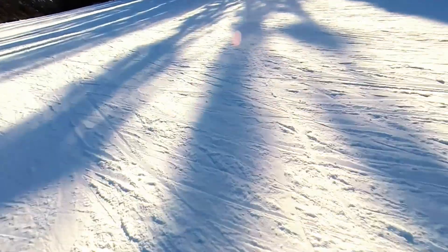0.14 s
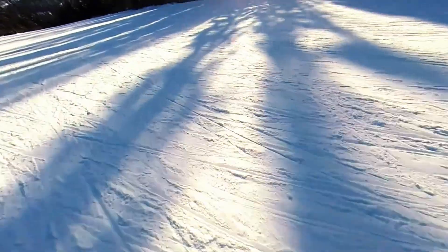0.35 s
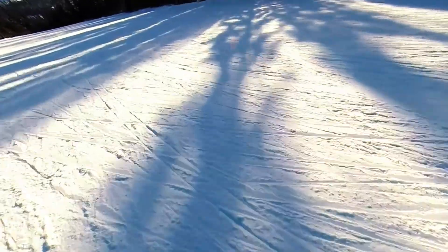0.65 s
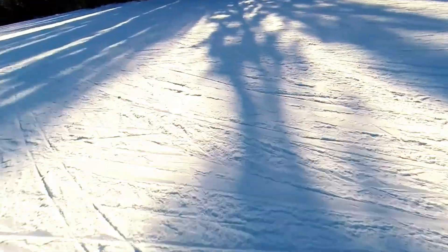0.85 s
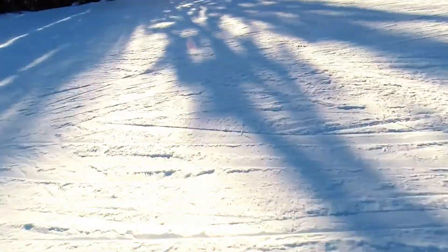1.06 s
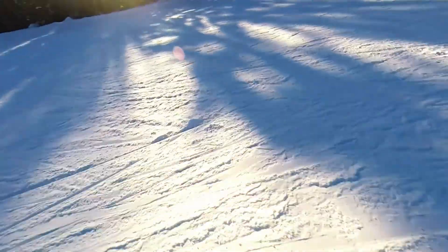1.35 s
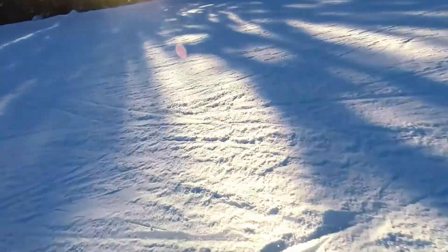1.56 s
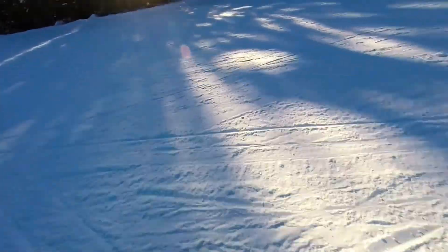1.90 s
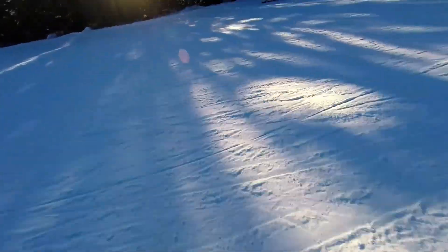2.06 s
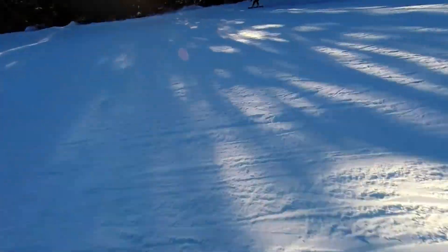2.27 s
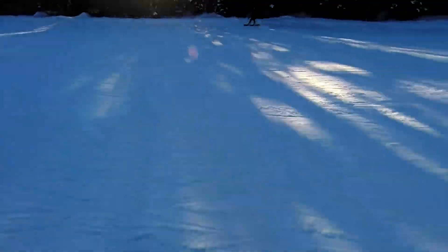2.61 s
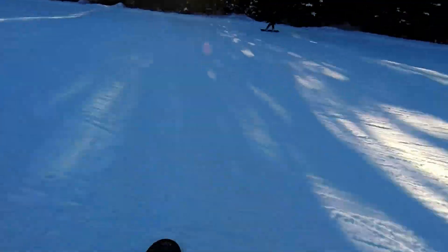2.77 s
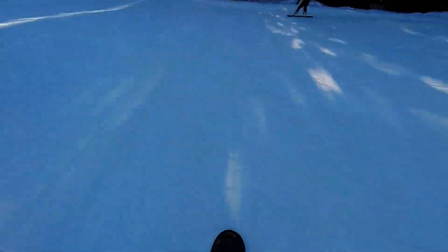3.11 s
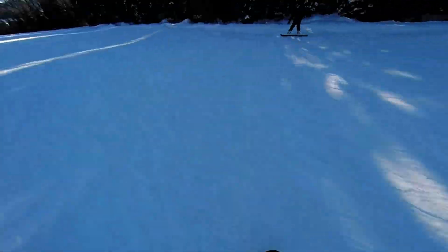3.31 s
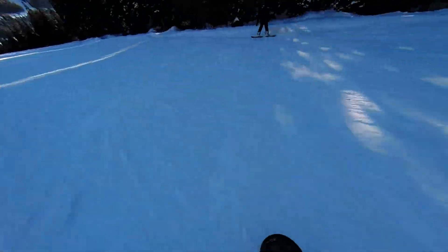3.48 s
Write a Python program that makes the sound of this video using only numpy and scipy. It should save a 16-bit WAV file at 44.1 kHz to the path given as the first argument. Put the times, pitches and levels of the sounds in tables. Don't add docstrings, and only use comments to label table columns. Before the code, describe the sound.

A snowboard hisses and scrapes over packed snow on an open slope, heard close through a closed plastic camera housing; low wind and board rumble beneath, small knocks, then a very loud sharp click near the end.

```python
import sys
import numpy as np
from scipy import signal
from scipy.io import wavfile
from scipy.ndimage import uniform_filter1d

SR = 44100
rng = np.random.default_rng(int(sys.argv[2]) if len(sys.argv) > 2 else 0)


def makeup_ratio(level_db):
    decades = np.asarray(level_db, float) / 20
    return 10 ** decades


def store_wav(level_fs):
    pcm = np.round(np.clip(np.atleast_2d(level_fs), -1, 1) * 32767)
    wavfile.write(sys.argv[1], SR, pcm.T.astype(np.int16))


N = 160965


def evened(x):
    return x / np.sqrt(np.mean(x ** 2) + 1e-20)


def curve(table, column):
    rows = np.array(table)
    return np.interp(np.arange(N) / SR, rows[:, 0], rows[:, column])


def add(mix, start_s, sound):
    part = mix[round(start_s * SR):][:len(sound)]
    part += sound[:len(part)]


def response(peaks, tilt_db=0., size=8192):
    hz = abs(np.fft.fftfreq(size, 1 / SR)) + 1
    power = sum(makeup_ratio(2 * db) / (1 + (2 * (hz - f) / width) ** 2) ** 2 for f, width, db in peaks)
    tilt = makeup_ratio(2 * tilt_db * np.log2(hz / 2000))
    log_gain = np.log(power * tilt + 1e-14) / 2
    spectrum = np.exp(np.conj(signal.hilbert(log_gain)))
    return np.fft.ifft(spectrum).real[:size // 2]


def colour(x, peaks):
    return evened(signal.oaconvolve(x, response(peaks))[:N])


def patchy(x, patch_db, wide=6, long=8, size=512):
    overlap = size * 3 // 4
    z = signal.stft(x, nperseg=size, noverlap=overlap)[2]
    field = rng.standard_normal(z.T.shape).T
    field = uniform_filter1d(uniform_filter1d(field, wide, 0), long, 1)
    z = z * makeup_ratio(patch_db * evened(field))
    return signal.istft(z, nperseg=size, noverlap=overlap)[1][:N]


def slow(top_hz):
    t = np.arange(0, N, 64) / SR
    rates = np.geomspace(3, top_hz, num=30)
    wave = sum(np.sin(2 * np.pi * (f * t + rng.random())) / f ** 0.11 for f in rates)
    return np.interp(np.arange(N) / SR, t, evened(wave))


# (pitch [Hz], width [Hz], level [dB])
HOUSING_RESONANCES = [(1214, 310, -13.5), (1766, 222, -3), (2020, 573, 1.5), (2415, 650, -2.5),
                      (2897, 740, -6), (3424, 304, -9.5), (4140, 940, -23), (5000, 790, -15),
                      (5890, 1120, -23.5), (6800, 1500, -24.5), (8440, 1800, -27), (10160, 1440, -32.5),
                      (11360, 2200, -36), (14100, 3700, -42)]
# (time [s], scrape level [dB], spray against scrape [dB], rumble against scrape [dB])
RIDE_LEVELS = [(0, -42.5, -26, -7.5), (.1, -43, -22.5, -6.5), (.6, -43.5, -26.5, -5), (.85, -43, -23, -6.5),
               (1.02, -45, -21.5, 0), (1.1, -41, -20.5, -9.5), (1.33, -40, -20.5, -7.5),
               (1.48, -41.5, -22.5, -9.5), (1.56, -45, -18.5, -1.5), (1.92, -41.5, -22, -4.5),
               (2.12, -42.5, -20, -4), (2.5, -44, -20.5, 2), (2.74, -41.5, -24, -2.5), (2.9, -47, -20, 0.5),
               (3.12, -43, -22.5, -0.5), (3.4, -38.5, -23, -5), (3.5, -38, -19, -1.5),
               (3.65, -37.5, -23.5, -8.5)]


def snow():
    crystals_per_s, crystal_spread_db, crystal_share = 2500, 1.5, 0.39
    patch_db, chatter_db = 0.74, 1.12
    low_top_hz, spray_from_hz, spray_extra_db = 3900, 4600, 1.5
    size = makeup_ratio(crystal_spread_db * np.minimum(rng.exponential(1, N), 5))
    breaks = rng.random(N) < crystals_per_s / SR
    crystals = evened(size * breaks * rng.choice([-1., 1.], N))
    smooth = rng.standard_normal(N)
    drive = np.sqrt(crystal_share) * crystals + np.sqrt(1 - crystal_share) * smooth
    hiss = colour(patchy(drive, patch_db), HOUSING_RESONANCES) * makeup_ratio(chatter_db * slow(40))

    top = signal.sosfiltfilt(signal.butter(2, spray_from_hz, "high", fs=SR, output="sos"), hiss)
    low = signal.sosfiltfilt(signal.butter(3, low_top_hz, "low", fs=SR, output="sos"), hiss)
    middle = hiss - low - top
    spray_db = curve(RIDE_LEVELS, 2)
    spray_db = spray_db - np.mean(spray_db)
    spray = middle * makeup_ratio(spray_db) + top * makeup_ratio(spray_extra_db + spray_db)
    return makeup_ratio(curve(RIDE_LEVELS, 1)) * (low + spray)


# (pitch [Hz], width [Hz], level [dB])
WIND_BANDS = [(13.9, 13, -2), (36, 11.4, -3)]


def wind(shake):
    level_db, follow = -41, 0.72
    gusts = uniform_filter1d(shake, size=6000) ** follow
    return colour(rng.standard_normal(N), WIND_BANDS) * makeup_ratio(level_db) * gusts


# (pitch [Hz], width [Hz], level [dB])
BOARD_RESONANCES = [(67.5, 37, -50.5), (115, 54, -51), (217.6, 99, -59.5), (300, 175, -58.5),
                    (435, 270, -65), (646, 240, -68), (900, 510, -75.5)]


def rumble(shake):
    rumble_follow, shake_follow, patch_db = 0.72, 0.093, 2
    level_db = curve(RIDE_LEVELS, 1) + rumble_follow * curve(RIDE_LEVELS, 3)
    rough = patchy(rng.standard_normal(N), patch_db, wide=3, long=4, size=2048)
    return makeup_ratio(level_db) * shake ** shake_follow * colour(rough, BOARD_RESONANCES)


# (time [s], peak level [dB], flexing pitch [Hz], length [s])
SNOW_BUMPS = [(0.095, -34.5, 36.9, 0.2), (0.263, -44, 37, 0.03), (0.471, -37, 33, 0.055),
              (0.56, -36, 29.5, 0.15), (1.198, -29.5, 37.7, 0.086), (1.36, -31, 37.8, 0.046),
              (1.446, -32.5, 34.6, 0.1), (1.595, -36.5, 35.5, 0.054), (1.754, -34.5, 38.4, 0.061),
              (1.829, -40, 35.2, 0.045), (1.892, -36.5, 35.6, 0.14), (1.963, -39, 36.4, 0.038),
              (2.179, -34.5, 37, 0.075), (2.263, -32, 37.4, 0.043), (2.338, -34.5, 38.4, 0.064),
              (2.516, -35, 33, 0.096), (2.688, -34, 32.8, 0.076), (2.841, -33.5, 32.8, 0.098),
              (2.983, -35, 34.9, 0.049), (3.107, -32.5, 33, 0.053), (3.196, -26.8, 35, 0.029),
              (3.331, -24.5, 34.6, 0.12), (3.463, -28, 35, 0.042), (3.606, -23, 33.8, 0.039)]


def board_flex():
    stretch = 1.19
    t, flex, swing = np.arange(N) / SR, np.zeros(N), np.zeros(N)
    for (s, db, hz, length_s), phase in zip(SNOW_BUMPS, rng.random(len(SNOW_BUMPS))):
        shape = makeup_ratio(db) * np.exp(-2.8 * ((t - s) / (stretch * length_s)) ** 2)
        flex += shape * np.cos(2 * np.pi * (hz * (t - s) + phase))
        swing += shape
    shake = (swing + 0.0067) / np.median(swing + 0.0041)
    return flex, shake


# (time [s], peak level [dB], pitch [Hz], time to fall 60 dB [s])
MOUNT_KNOCKS = [(0.539, -37, 128, 0.075), (.91, -24, 95, 0.067), (.92, -34.5, 48, 0.31),
                (1.079, -29, 41, 0.27), (1.32, -34.5, 300, 0.086), (1.761, -25.5, 3400, .008),
                (2.897, -37, 5000, 0.0045), (3.024, -38, 6200, .004), (3.089, -38, 6500, 0.0052),
                (3.2704, -20.5, 690, 0.023), (3.271, -28, 5050, 0.0068), (3.34, -32, 420, .03),
                (3.455, -19.5, 6800, 0.0076), (3.455, -26.5, 1176, 0.027), (3.46, -31.5, 115, 0.11),
                (3.505, -37, 320, 0.071), (3.543, -20.5, 311, 0.04)]


def knocks():
    out = np.zeros(N)
    for s, db, hz, t60 in MOUNT_KNOCKS:
        t = np.arange(0, 1.2 * t60, 1 / SR)
        rise = np.minimum(t * hz / 1.33, 1)
        add(out, s, makeup_ratio(db - 60 * t / t60) * rise * np.sin(2 * np.pi * hz * t))
    return out


# (pitch [Hz], level [dB], ring time [ms])
LID_RINGS = [(2051, 1.5, 0.43), (2384, -6.5, 0.65), (2880, -16.5, 0.93), (3330, -18, 0.73)]
# (time [s], peak level [dB], brightness [dB per octave])
ICE_CHIPS = [
    (1.6811, -21, -9),
    (3.2698, -20.5, 11),
    (3.3521, -21, -9),
    (3.373, -33, 12),
    (3.4549, -0.9, -1),
    (3.4617, -20, 3),
    (3.4704, -18.5, 5),
    (3.516, -34, -6),
]


def chips():
    out, ms = np.zeros(N), np.arange(800) / SR * 1000
    for s, db, tilt_db in ICE_CHIPS:
        ring = np.zeros(len(ms))
        for hz, lid_db, ring_ms in LID_RINGS:
            swell = (ms / ring_ms) ** 2 * np.exp(-ms / ring_ms)
            level = makeup_ratio(lid_db + tilt_db * np.log2(hz / 2000))
            ring += level * swell * np.sin(2 * np.pi * hz * ms / 1000)
        add(out, s, makeup_ratio(db) * ring / abs(ring).max())
    return out


# (time [s], peak level [dB], brightness [dB per octave], decay [ms])
HOUSING_CRACKS = [
    (1.7607, -38, 3, .6),
    (2.477, -41, 8, 1.2),
    (3.2695, -34, 6, 1.5),
    (3.4548, -7, 14, 0.41),
    (3.4612, -39, 11, .8),
]


def cracks():
    out, ms = np.zeros(N), np.arange(800) / SR * 1000
    noises = rng.standard_normal((len(HOUSING_CRACKS), 800))
    for (s, db, tilt_db, decay_ms), noise in zip(HOUSING_CRACKS, noises):
        splinters = noise * np.exp(-ms / decay_ms)
        ring = np.convolve(splinters, response(HOUSING_RESONANCES, tilt_db)[:800])
        add(out, s, makeup_ratio(db) * ring / abs(ring).max())
    return out


# (start [s], end [s], pitch [Hz], width [Hz], level [dB])
EDGE_CARVES = [
    (1.855, 2.016, 3120, 1100, -50),
    (2.576, 2.827, 2380, 700, -50.5),
    (2.95, 3.46, 5170, 900, -60),
    (3.166, 3.464, 6250, 900, -52.5),
    (3.173, 3.401, 2630, 1040, -41.5),
    (3.518, 3.7, 5180, 1500, -48.5),
    (3.496, 3.7, 3100, 1270, -40),
]


def carves():
    rise_s, waver_db = 0.035, 2.0
    out, t = np.zeros(N), np.arange(N) / SR
    for start, end, hz, width, db in EDGE_CARVES:
        bite = np.clip(np.minimum(t - start, 2 * (end - t)) / rise_s, 0, 1)
        song = colour(rng.standard_normal(N), [(hz, width, 0)])
        out += bite * makeup_ratio(db + waver_db * slow(50)) * song
    return out


def scene():
    flex, shake = board_flex()
    ride = snow() + wind(shake) + rumble(shake) + flex
    clicks = knocks() + chips() + cracks()
    return (ride + clicks + carves())[None]


def roll_off(x):
    return signal.sosfilt(signal.butter(12, 16340, fs=SR, output="sos"), x)


def record(dry):
    top_hz = 15350
    low_pass = signal.firwin(511, top_hz, window=("kaiser", 9), fs=SR)
    limited = signal.oaconvolve(dry, low_pass[None], "same")
    return roll_off(limited)


dry = scene()
out = record(dry)
store_wav(out)
```